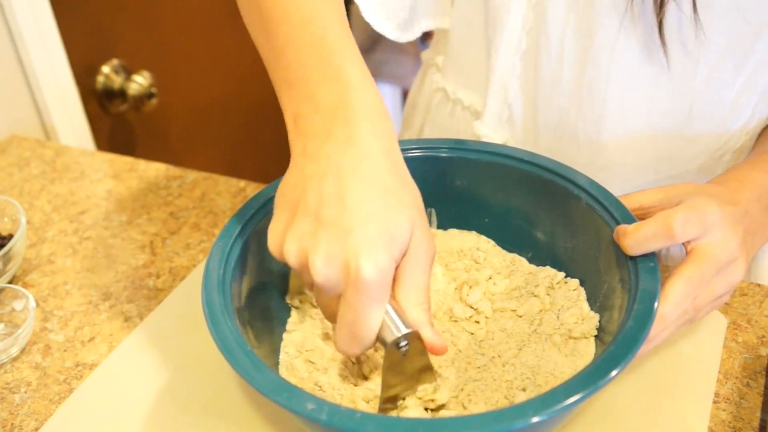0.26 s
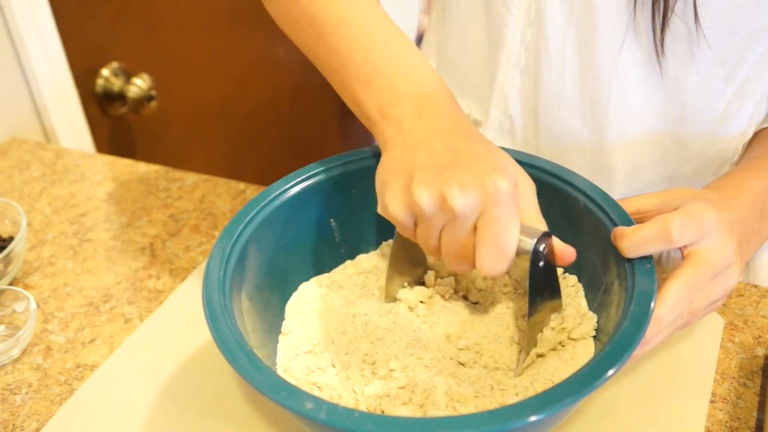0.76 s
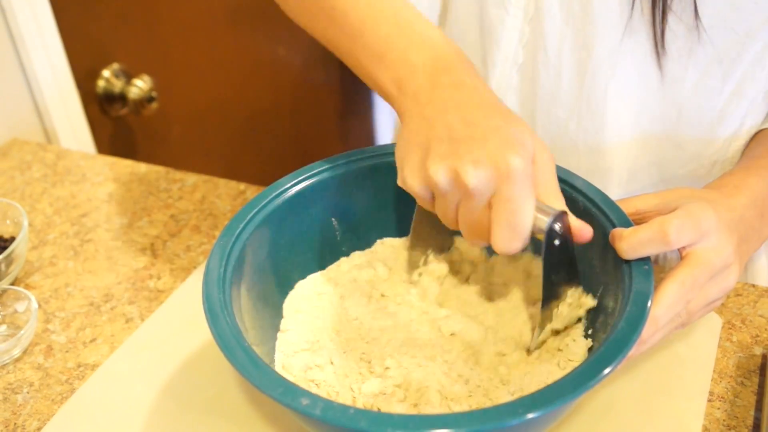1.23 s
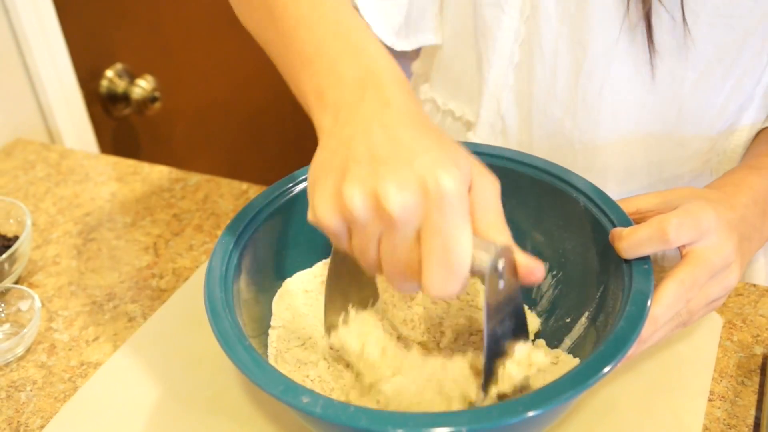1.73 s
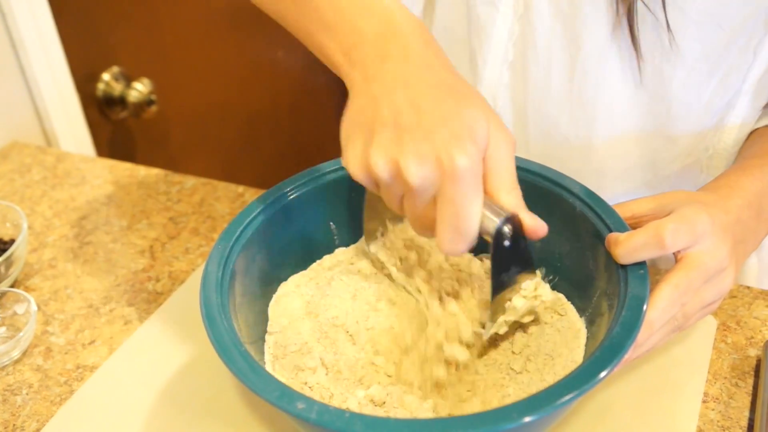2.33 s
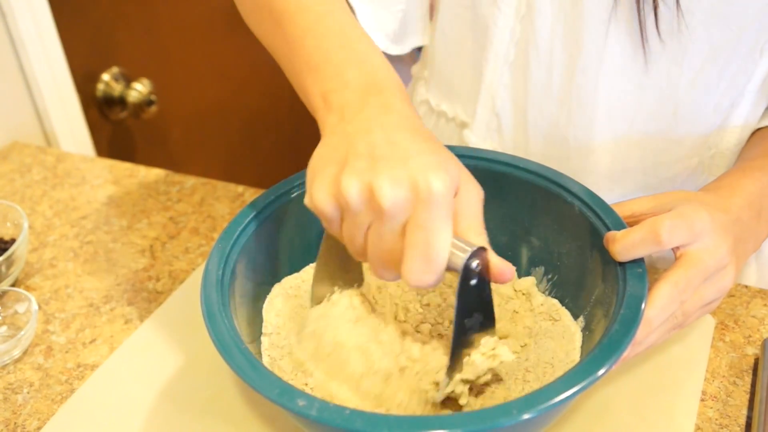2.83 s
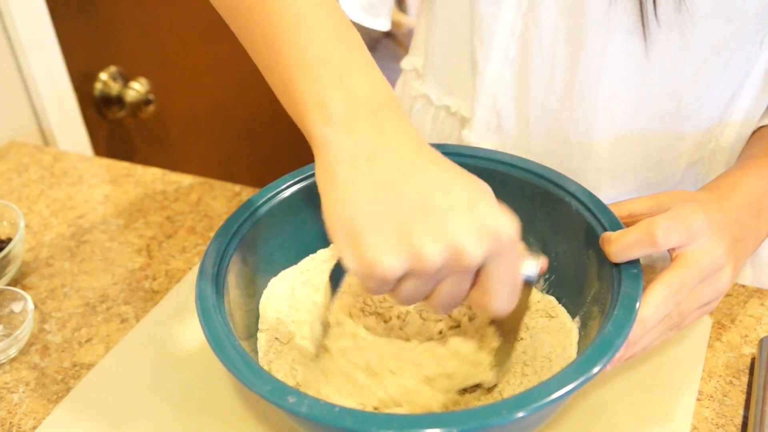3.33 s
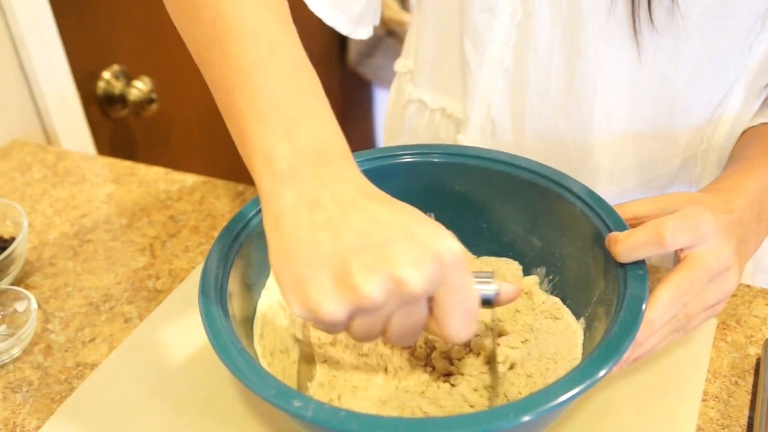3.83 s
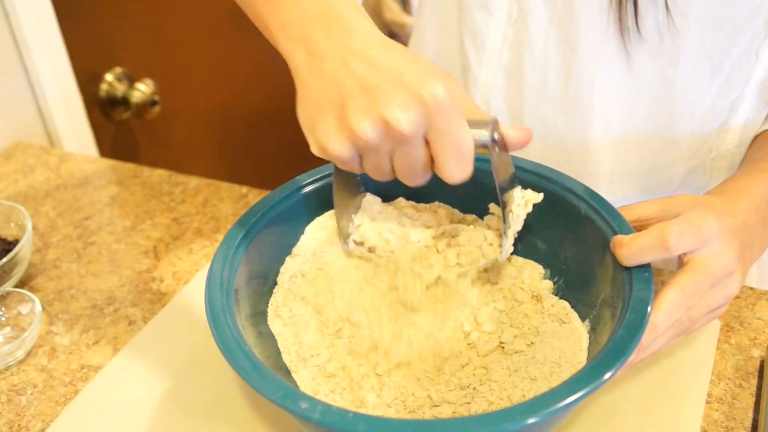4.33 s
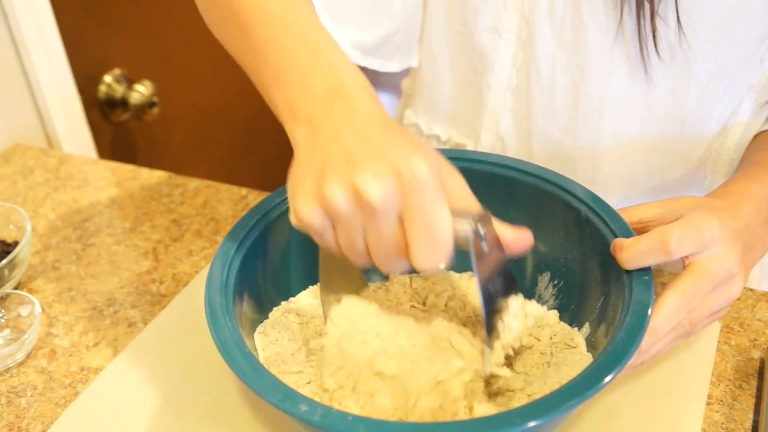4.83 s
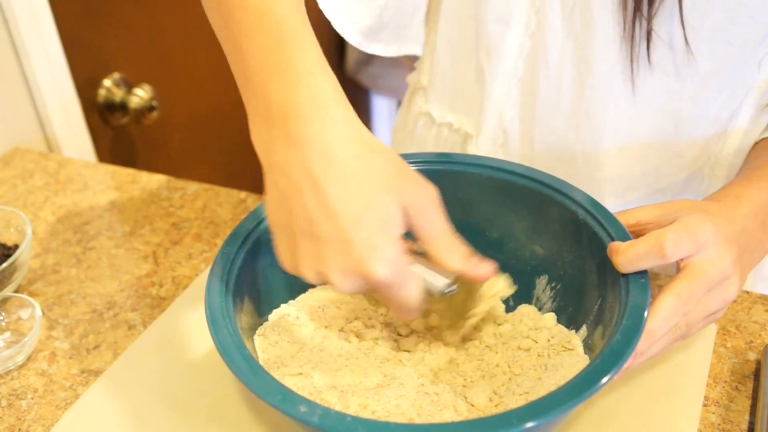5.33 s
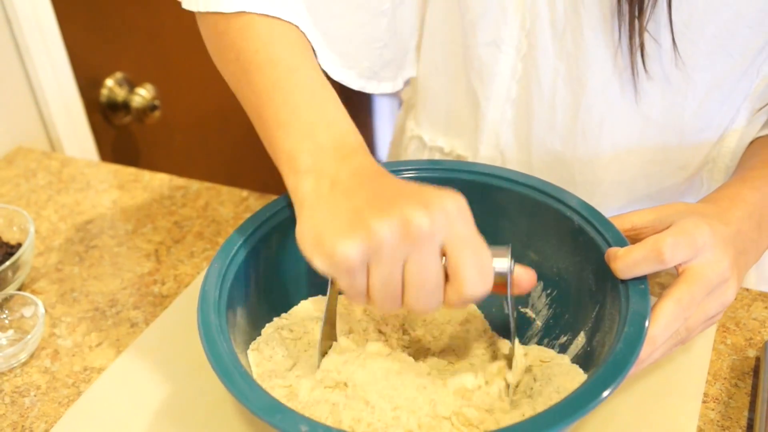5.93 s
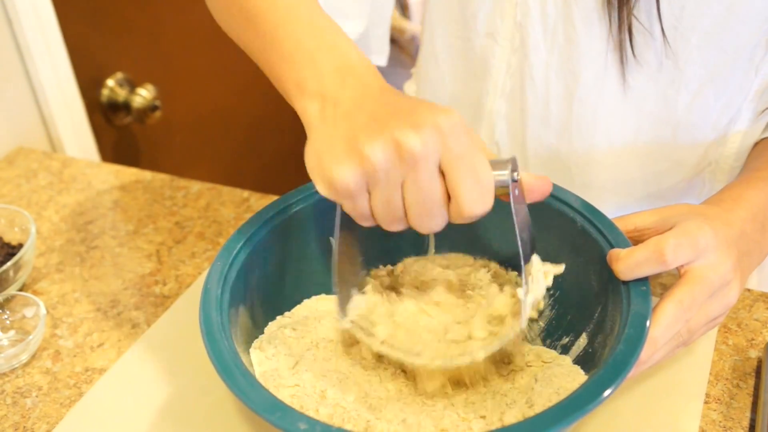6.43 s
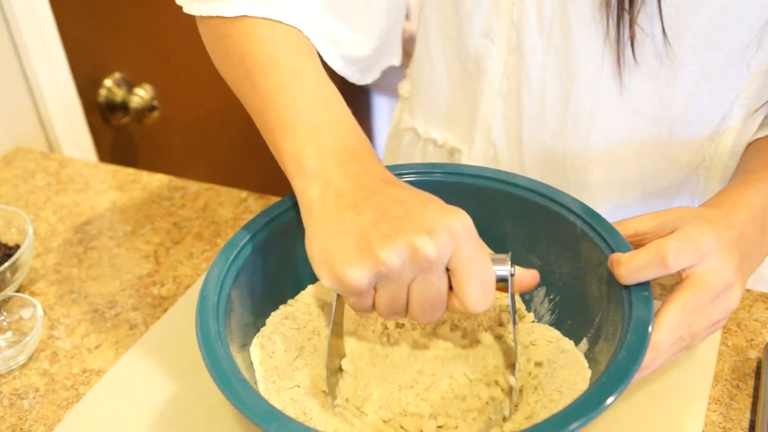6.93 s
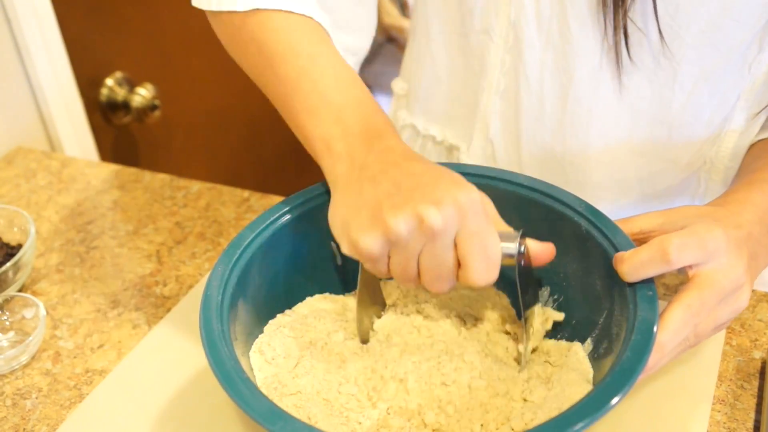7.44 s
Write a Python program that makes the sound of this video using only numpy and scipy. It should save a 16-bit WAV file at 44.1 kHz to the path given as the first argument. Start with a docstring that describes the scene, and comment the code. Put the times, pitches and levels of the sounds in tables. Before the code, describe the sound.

A steel pastry cutter chops flour and butter in a plastic bowl on a counter, heard close in stereo in a small live kitchen with faint air noise. At 0 s a quick double metallic clack and a swish lead to a crunchy knock at 0.15. After a gap, softer gritty chops fall at 0.85 and 0.9, then a scraping touch at 1.25 and a dull chop at 1.5. Firmer hollow thuds come at 2.0 and 2.1, a crunchy one at 2.6, lighter ones near 3.1 and 3.25. A steel clack strikes at 3.6, followed by a soft, dry sweep. A strong crunch at 4.65 is followed by bright ticks at 4.7. Another clack sounds at 5.3, then light chops and faint rasps until 6.1. The hardest, ringing knock hits at 6.7, with a thump at 6.8; small soft chops end at 7.0 and 7.5.

```python
"""A steel pastry cutter chops flour and butter in a plastic bowl held on a kitchen counter, over faint room noise.
From the start, strokes swish through flour (sheared noise), crunch it (bursts of grains), ring the bowl
(decaying modes) and thump it on the counter; blades clack on the bare wall (steel modes). From 1.25 s they also
drag along it (gliding narrow noise), and from 2.66 s they tick (treble bursts). The hardest blow falls at 6.69 s,
the last chop at 7.54 s. Diffuse echoes of a small, live kitchen follow every sound."""
import sys
import numpy as np
from scipy import signal
from scipy.fft import rfft, irfft, next_fast_len
from scipy.io import wavfile
from scipy.ndimage import uniform_filter1d

SR = 44100
rng = np.random.default_rng(int(sys.argv[2]) if len(sys.argv) > 2 else 0)


def wrap_up_sound(samples):
    """Save the sound to the file named by the first command line argument, as 16-bit audio."""
    columns = np.atleast_2d(samples).T
    # keep every value between -1 and 1, then stretch to whole-number steps
    tamed = np.clip(columns, -1, 1)
    steps = np.round(tamed * 32767).astype(np.int16)
    wavfile.write(sys.argv[1], SR, steps)


N = 338247
RING = np.arange(SR // 2) / SR  # time axis of one blow, s

# Kitchen echo bands. Each row: centre in Hz, t60 in s, echo level in dB, likeness of left and right (0-1).
KITCHEN_BANDS = [(150, 0.37, -20, 0.9), (466, 0.34, -0.5, 0.18), (1160, 0.5, -3, 0), (2800, 0.41, -1, 0),
                 (6740, 0.33, -1, 0.27), (15100, 0.24, -4, 0.2)]


def undb(db):
    """Decibels to gain."""
    return 10 ** (np.asarray(db) / 20)


def unit(x):
    """Scale to rms 1."""
    return x / np.sqrt(np.mean(x ** 2))


def blow(x):
    """Scale a transient to the energy of 10 ms at rms 1."""
    return x / np.sqrt(np.sum(x ** 2) / (SR / 100))


def add(track, start_s, x):
    """Mix x into the track from start_s on."""
    start = max(int(start_s * SR), 0)
    track[start:start + len(x)] += x[:max(N - start, 0)]


def decay(t, t60_s):
    """Exponential decay by 60 dB in t60_s."""
    return np.exp(-np.log(1000) * t / t60_s)


def over_hz(hz, values, size):
    """Spread a table over the bins of an FFT, straight on a log-frequency axis."""
    bins_hz = np.fft.rfftfreq(size, 1 / SR)
    return np.interp(np.log(bins_hz + 1), np.log(hz), values)


def colour(x, points, size=2048):
    """Minimum-phase filter shaped by (Hz, dB) points, via the folded cepstrum; overall gain is arbitrary."""
    cepstrum = irfft(np.log(undb(over_hz(*np.transpose(points), size))))
    response = irfft(np.exp(rfft(2 * cepstrum[:size // 2], size)))
    return signal.fftconvolve(x, response)[:len(x)]


def cushion(x, cutoff_hz):
    """A softer contact passes less treble: first-order low-pass."""
    return signal.sosfilt(signal.butter(1, min(cutoff_hz, SR / 3), fs=SR, output="sos"), x)


def grains(size, spread_db):
    """Dense tiny fractures, a few much larger than the rest."""
    size_db = spread_db * np.minimum(rng.exponential(size=size), 5)
    return unit(rng.standard_normal(size) * undb(size_db))


def ring(modes, place_hz, favour_db):
    """Decaying modes; the place of the blow favours those near one note, the grip scatters the rest a little."""
    hz, db, t60_s = np.transpose(modes)[:, :, None]
    scatter_db, shift, turn = rng.standard_normal((3, len(hz), 1))
    db = db + favour_db * np.exp(-(np.log(hz / place_hz) / .1) ** 2) + scatter_db
    waves = np.sin(2 * np.pi * hz * (1 + .005 * shift) * RING) * np.sign(turn)
    return blow(np.sum(undb(db) * waves * decay(RING, t60_s), axis=0))


def crack(t60_s):
    """The crowd of heavily damped modes at the start of a hard contact, as decaying coloured noise."""
    # Each row: frequency in Hz, relative density in dB per Hz.
    crack_spectrum = [(150, -33.5), (500, -6.5), (1200, 5), (1650, -4.5), (2600, 1.5), (4200, 4.5),
                      (6400, -2), (8000, -9.5), (16000, -80)]
    return blow(colour(rng.standard_normal(len(RING)) * decay(RING, t60_s), crack_spectrum))


def slide(start_s, end_s, rise_s, fall_s):
    """Progress 0-1 and envelope of one movement of the hand."""
    length_s = end_s - start_s
    t = np.arange(int((length_s + 5 * fall_s) * SR)) / SR
    rise = 1 - np.exp(-t / rise_s)
    fall = np.exp(-np.maximum(t - length_s, 0) / fall_s)
    return np.minimum(t / length_s, 1), rise * fall


def stereo_noise(size):
    """Spectra of a diffuse field at two close microphones: alike in the bass, less so in the treble."""
    hz, _, _, likeness = np.transpose(KITCHEN_BANDS)
    alike = np.clip(over_hz(hz, likeness, size), 0, 1)
    mid, side = rfft(rng.standard_normal((2, size)))
    polarity = np.array([[1], [-1]])
    return (mid * np.sqrt(1 + alike) + side * np.sqrt(1 - alike) * polarity) / np.sqrt(2)


def room_noise():
    """Steady faint air noise: shaped diffuse stereo noise."""
    # Each row: frequency in Hz, relative density in dB per Hz.
    air_spectrum = [(25, -7), (60, 1), (125, -6), (200, -11), (330, -3), (700, -2.5), (1100, -1.5),
                    (1700, -7.5), (2700, -10.5), (7000, -16), (16000, -20)]
    level_db = -55
    size = next_fast_len(N) * 2
    air = irfft(stereo_noise(size) * undb(over_hz(*np.transpose(air_spectrum), size)))[:, :N]
    return unit(air) * undb(level_db)


def kitchen(x, size=32768):
    """Echoes build up within a few milliseconds and die away, soonest in the top treble: banded decaying noise."""
    t = np.arange(size) / SR
    field = stereo_noise(size)
    response = 0
    centres_hz = np.transpose(KITCHEN_BANDS)[0]
    for band, (_, t60_s, db, _) in zip(np.eye(len(KITCHEN_BANDS)), KITCHEN_BANDS):
        tail = decay(t, t60_s) * (1 - np.exp(-t / 0.0004))
        noise = irfft(field * over_hz(centres_hz, band, size))
        response = response + noise * undb(db) * tail / np.sqrt(np.sum(tail ** 2))
    # a cluttered room is diffuse: no single note booms above its neighbours
    spectrum = rfft(response)
    power = np.mean(abs(spectrum) ** 2, axis=0)
    even = np.sqrt(uniform_filter1d(power, size=300) / uniform_filter1d(power, size=13))
    echoes = irfft(spectrum * even) * (t < .55)
    return signal.fftconvolve(x[None], echoes, axes=1)[:, :N]


def near_walls(x, size=512):
    """Treble bounces around inside the bowl and reaches the two microphones in opposite polarity."""
    t = np.arange(size) / SR
    treble = undb(over_hz([1000, 3000, 9000], [-25, -8, 0], size))
    paths = irfft(rfft(rng.standard_normal(size)) * treble)
    paths = paths * t * np.exp(-t / 0.00053)
    spread = signal.fftconvolve(x, paths / np.sqrt(np.sum(paths ** 2)))[:N]
    return undb(-7.0) * spread * np.array([[1], [-1]])


def pressure(start_s, end_s, from_db, to_db):
    """Force of the flour on the blades through one movement of the hand."""
    depth, envelope = slide(start_s, end_s, rise_s=.01, fall_s=.01)
    force = np.zeros(N)
    add(force, start_s, envelope * undb(from_db + (to_db - from_db) * depth))
    return force


def swishes():
    """Flour shears past the blades as coloured grain noise; lumps make it uneven and dry powder hisses."""
    # Flour shear. Each row: frequency in Hz, relative density in dB per Hz.
    shear_spectrum = [(90, -6), (200, 1), (380, -4), (620, -0.5), (1000, 1), (1600, -2.5), (2900, -4.5),
                      (3700, 1), (4900, -2.5), (6500, -6), (10000, -11.5), (16000, -17.5)]
    # Blades sink to the bottom. Each row: start in s, end in s, nominal shear level at the bottom in dB.
    plunges = [(0.747, 0.825, -40.5), (0.876, 0.9, -38.5), (1.874, 2, -44.5), (2.452, 2.587, -41.5),
               (2.563, 2.596, -36), (3.058, 3.117, -44.5), (3.192, 3.249, -46), (3.507, 3.61, -59),
               (4.39, 4.658, -46), (5.596, 5.837, -49), (6.673, 6.68, -29.5), (6.781, 6.821, -38),
               (7.297, 7.481, -47.5)]
    # Blades push sideways or pull out. Each row: start in s, end in s, nominal shear level at the start in dB,
    # powder hiss relative to shear in dB.
    sweeps = [(0, 0.162, -42.5, -10), (1.268, 1.396, -39.5, -3), (2.598, 2.69, -43.5, -20),
              (3.799, 4.11, -52.5, -4), (4.67, 4.759, -43, -4), (5.846, 5.96, -49.5, -12),
              (6.294, 6.43, -57.5, -6), (7.491, 7.543, -46, -19)]
    packing_db, loosening_db = 11.5, 6  # swell as flour packs, fade as it falls away
    powder_base_db, powder_db_per_shear_db = -39.5, 0.27  # plunges only
    powder_spectrum = [(3000, -16), (7000, 4.5), (11000, 1), (16000, -2)]  # Hz, dB

    shear = unit(colour(grains(N, spread_db=3.5), shear_spectrum))
    powder = unit(colour(grains(N, spread_db=1.0), powder_spectrum))
    out = np.zeros(N)
    for start_s, end_s, db in plunges:
        hiss_db = powder_base_db + powder_db_per_shear_db * db
        flour = undb(db) * shear + undb(hiss_db) * powder
        out += pressure(start_s, end_s, -packing_db, 0) * flour
    for start_s, end_s, db, powder_db in sweeps:
        flour = shear + undb(powder_db) * powder
        out += pressure(start_s, end_s, db, db - loosening_db) * flour
    lumps = unit(uniform_filter1d(rng.standard_normal(N), size=300))
    return out * undb(0.62 * lumps - 2.0)


def narrow_noise(hz, width_hz):
    """Friction noise in a resonance whose centre may move: low-passed complex noise on a carrier."""
    noise = rng.standard_normal(len(hz)) + 1j * rng.standard_normal(len(hz))
    slow = cushion(cushion(noise, width_hz), width_hz)
    return unit(np.real(slow * np.exp(2j * np.pi * np.cumsum(hz) / SR)))


def drags():
    """A blade rasps along the wall; its resonance glides as the contact point moves."""
    # Each row: start in s, end in s, level in dB, first resonance in Hz at start, at end, second resonance in Hz.
    wall_drags = [(1.251, 1.257, -34.5, 3120, 3200, 3970), (1.997, 2, -37, 3610, 3550, 4100),
                  (2.696, 2.802, -55.5, 2366, 1800, 3870), (3.825, 3.877, -55, 1172, 1100, 1247),
                  (4.409, 4.434, -54.5, 4240, 4200, 1574), (5.75, 5.839, -53.5, 2330, 2460, 3760),
                  (5.816, 5.966, -55, 1086, 1880, 3310), (6.035, 6.077, -54, 1956, 1400, 1893),
                  (6.067, 6.115, -58.5, 2200, 2750, 2960)]
    out = np.zeros(N)
    for start_s, end_s, db, from_hz, to_hz, second_hz in wall_drags:
        way, envelope = slide(start_s, end_s, rise_s=0.0022, fall_s=.01)
        gliding = narrow_noise(from_hz + (to_hz - from_hz) * way, width_hz=330)
        steady = narrow_noise(np.full(len(way), second_hz), width_hz=240)
        add(out, start_s, undb(db) * envelope * unit(gliding + undb(-3.0) * steady))
    return out


def ticks():
    """A blade slips and catches with a light, bright tick: a very short burst of high-passed noise."""
    # Each row: start in s, level in dB.
    blade_ticks = [(2.657, -50), (4.7075, -33.5), (4.7125, -35.5)]
    t60_s, low_cut_hz = .009, 2000
    out = np.zeros(N)
    for start_s, db in blade_ticks:
        snap = rng.standard_normal(len(RING)) * decay(RING, t60_s)
        add(out, start_s, undb(db) * blow(snap - cushion(snap, low_cut_hz)))
    return out


def clacks():
    """Steel meets bare plastic and the blades ring, longer when no flour clings to them."""
    # Each row: start in s, level in dB, contact bandwidth in Hz, blade note favoured by the place in Hz, #
    # relative ring length (longer for blades free of flour).
    wall_clacks = [(.001, -28, 6000, 1370, 2.1), (.018, -29.5, 7000, 1350, 2.6),
                   (1.252, -41, 8000, 3760, 0.35), (1.889, -46, 600, 1200, 0.77),
                   (3.607, -27, 1710, 1130, .85), (3.869, -45, 4000, 2350, 1),
                   (5.279, -26.5, 2900, 1150, 0.77), (6.69, -21.5, 2600, 1100, 0.74),
                   (7.019, -43, 700, 1240, 1.6)]
    # Steel cutter modes. Each row: frequency in Hz, relative level in dB, t60 in s at ring length 1.
    cutter_modes = [(1129, -2.5, 0.039), (1175, 5.5, 0.028), (1337, -6, 0.08), (2049, -2, 0.14),
                    (2125, -1.5, 0.027), (2684, -4, 0.04), (2860, -0.5, 0.073), (3200, -16, 0.036),
                    (3630, -3, 0.06), (3900, -6, 0.04), (3720, -18, 0.071), (4245, 1.5, 0.023),
                    (4770, -18, 0.1), (5020, -17, .06), (5630, -1, 0.031), (6190, 1, 0.057),
                    (7470, -9.5, 0.062)]
    out = np.zeros(N)
    for start_s, db, contact_hz, place_hz, ring_length in wall_clacks:
        modes = np.array(cutter_modes) * [1, 1, ring_length]
        steel = ring(modes, place_hz, favour_db=4) + undb(-5) * crack(t60_s=.045)
        add(out, start_s, undb(db) * blow(cushion(steel, contact_hz)))
    return out


def thump(note_hz):
    """The loaded bowl bounces on the counter as softly started damped modes; the hand's pressure sets the note."""
    # Bowl bottom on the counter. Each row: multiple of the thump note, relative level in dB, t60 in s.
    counter_modes = [(.85, -11, 0.15), (1, 6.5, 0.07), (1.17, 14.5, 0.024), (1.45, -3.5, 0.061)]
    ratio, db, t60_s = np.transpose(counter_modes)[:, :, None]
    swing = undb(db) * np.sin(2 * np.pi * note_hz * ratio * RING) * decay(RING, t60_s)
    return blow(swing.sum(axis=0) * (1 - np.exp(-RING / 0.012)))


def chops():
    """The blades crush packed flour, then the bowl rings and thumps on the counter."""
    # Blades reach the bottom. Each row: start in s, crunch level in dB, bowl ring level in dB,
    # counter thump level in dB, wall note favoured by the place in Hz.
    bottom_chops = [(.001, -43.5, -38, -40, 1150), (.146, -26.5, -27.5, -40.5, 482),
                    (.841, -35, -40.5, -45, 1080), (.902, -40.5, -53, -50, 1070),
                    (1.251, -37, -43.5, -47.5, 1030), (1.488, -60, -44.5, -49.5, 640),
                    (1.522, -35, -35.5, -46, 720), (1.889, -60, -46.5, -50.5, 890),
                    (1.996, -32, -28, -32.5, 473), (2.075, -30, -31.5, -40.5, 703),
                    (2.584, -28.5, -33, -43, 1160), (3.119, -42.5, -38.5, -51.5, 1134),
                    (3.248, -42, -46.5, -46, 860), (3.606, -51, -31.5, -42.5, 1170),
                    (4.642, -28, -30, -36.5, 983), (5.279, -46, -42, -43, 1210),
                    (5.589, -49, -45.5, -51.5, 470), (5.647, -43, -49.5, -69, 1010),
                    (6.690, -31.5, -18.5, -29.5, 490), (6.808, -43.5, -33, -27, 552),
                    (7.011, -52.5, -45.5, -47.5, 1170), (7.484, -51, -52.5, -46.5, 630),
                    (7.541, -46, -49.5, -51, 626)]
    # Bowl wall modes. Each row: frequency in Hz, relative level in dB, t60 in s.
    bowl_modes = [(276, -9.5, 0.19), (333, -5.5, .07), (490.7, -12, 0.14), (527.7, -1, 0.12),
                  (582.4, 0.5, 0.081), (642.6, -2, 0.16), (704, -2.5, 0.066), (840, 11, 0.032),
                  (1046, 2, 0.084), (1155, 2.5, 0.021), (1590, -26, .04), (1823, 3.5, 0.057),
                  (1972, 5, 0.049), (1932, -25, 0.075), (2440, 0, 0.14), (2584, 13, 0.024),
                  (2788, 2.5, 0.089), (3270, -22, 0.027), (3450, -1, 0.038), (4020, -21, 0.081),
                  (4490, -4.5, 0.26), (4950, -22, 0.042)]
    # Flour crunch. Each row: frequency in Hz, relative density in dB per Hz.
    crunch_spectrum = [(150, -23), (500, -5), (900, 1.5), (1500, -2.5), (2300, -1), (3000, -5.5),
                       (3700, 5.5), (5000, -3.5), (8000, -4.5), (12000, -10), (16000, -18)]
    # more crunch than ring means a deeper bed of flour and a longer crush
    equal_crush_s, crush_doubles_db, longest_crush_s = 0.00894, 20, .0115
    # contact bandwidth as a multiple of the wall note at firm_db; harder blows are brighter
    contact_per_note, firm_db, contact_doubles_db = 1.44, -33, 7.5
    mean_thump_hz, thump_scatter = 203.2, 0.026  # the grip varies the note by this share

    out = np.zeros(N)
    for start_s, crunch_db, bowl_db, thump_db, place_hz in bottom_chops:
        crush_s = equal_crush_s * 2 ** ((crunch_db - bowl_db) / crush_doubles_db)
        crush_s = min(crush_s, longest_crush_s)
        contact_hz = contact_per_note * place_hz * 2 ** ((bowl_db - firm_db) / contact_doubles_db)
        thump_hz = mean_thump_hz * (1 + thump_scatter * rng.standard_normal())
        # a deep bed of flour also blunts the attack
        load = 1 - np.exp(-RING / (crush_s ** 2 / .035))
        crush = load * (np.exp(-(RING / crush_s) ** 3) + undb(20) * np.exp(-RING / 0.0097))
        crunch = colour(grains(len(RING), spread_db=4.0) * crush, crunch_spectrum)
        add(out, start_s, undb(crunch_db) * blow(crunch))
        wall = ring(bowl_modes, place_hz, favour_db=13.5) + undb(0.5) * crack(t60_s=0.096)
        # the bowl takes the load only once the flour has given way
        add(out, start_s + 0.1531 * crush_s, undb(bowl_db) * blow(load * cushion(wall, contact_hz)))
        add(out, start_s + 0.23 * crush_s, undb(thump_db) * thump(thump_hz))
    return out


def scene():
    """The bowl reaches the right microphone 13 us late and 0.47 dB louder; echoes and room noise join it."""
    bowl = chops() + clacks() + ticks() + swishes() + drags()
    size, lag_s = next_fast_len(N) * 2, 1.3e-5
    delay = np.exp(-2j * np.pi * np.fft.rfftfreq(size, 1 / SR) * lag_s)
    right = irfft(rfft(bowl, size) * delay)[:N]
    direct = np.array([bowl, right * undb(0.47)])
    return direct + kitchen(bowl) + near_walls(bowl) + room_noise()


def record(dry):
    """The recorder thins the bass and cuts the top: a high-pass and a steep elliptic low-pass."""
    low_cut_hz, top_hz = 159, 16000
    thin = signal.sosfilt(signal.butter(3, low_cut_hz, "highpass", fs=SR, output="sos"), dry)
    return signal.sosfilt(signal.ellip(10, .2, 70, top_hz, fs=SR, output="sos"), thin)


dry = scene()
out = record(dry)
wrap_up_sound(out)
```